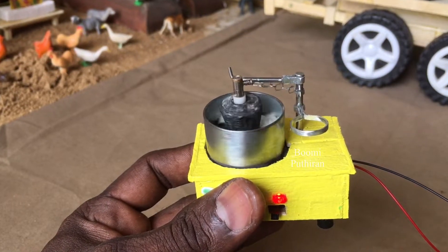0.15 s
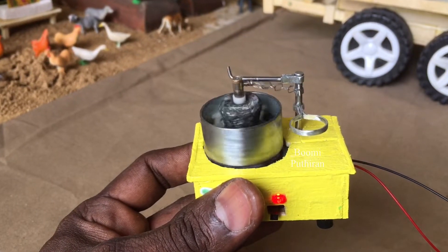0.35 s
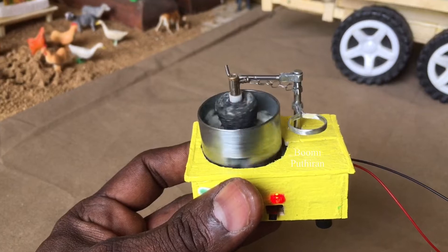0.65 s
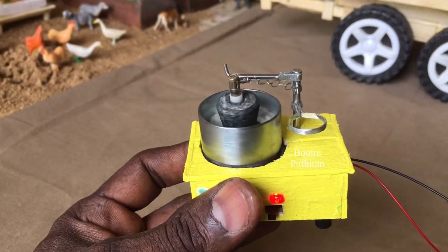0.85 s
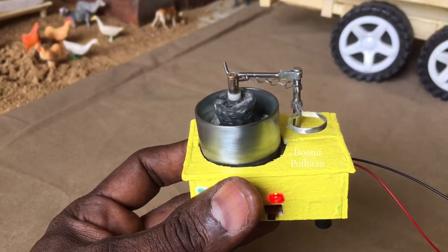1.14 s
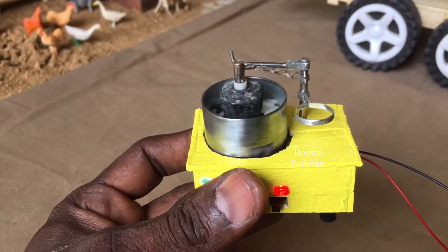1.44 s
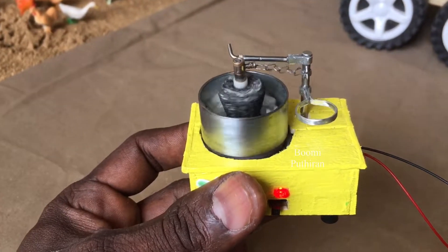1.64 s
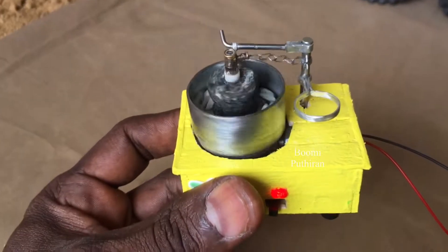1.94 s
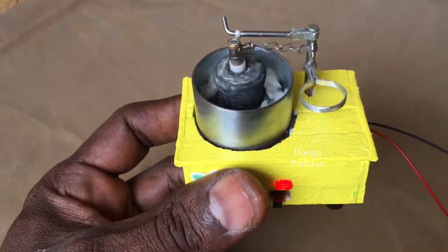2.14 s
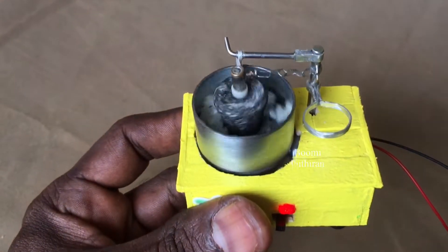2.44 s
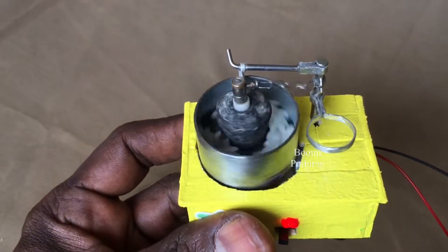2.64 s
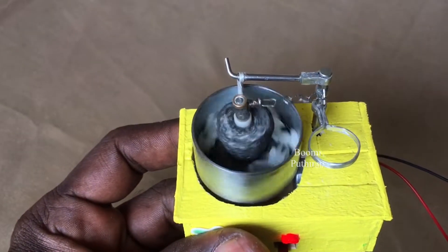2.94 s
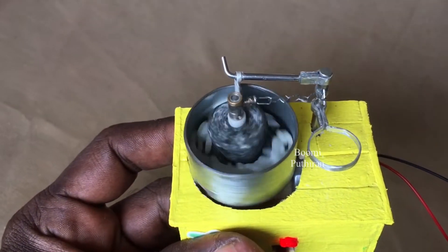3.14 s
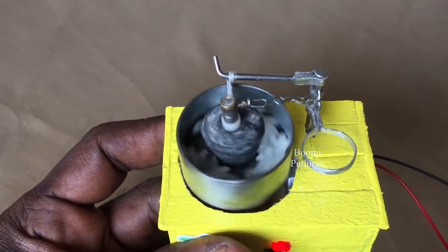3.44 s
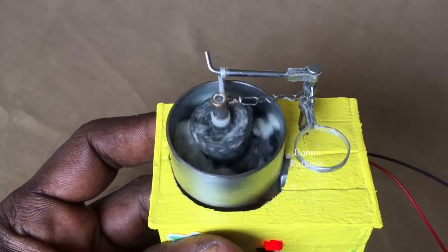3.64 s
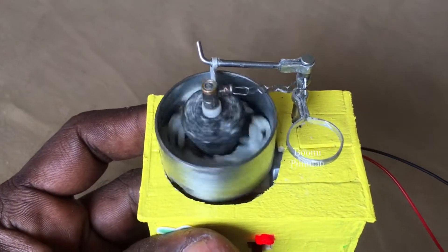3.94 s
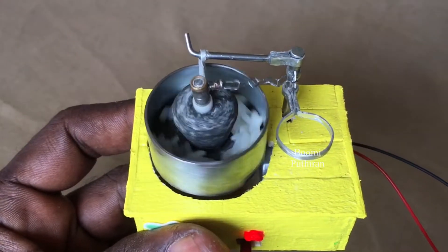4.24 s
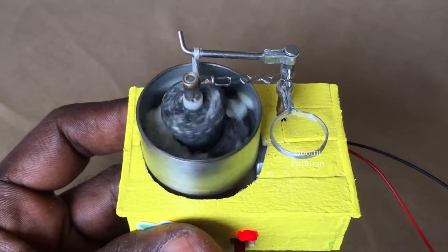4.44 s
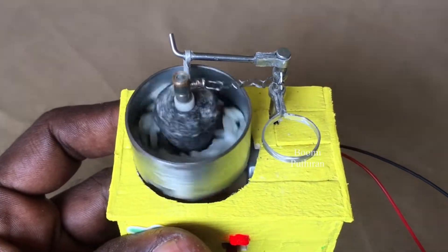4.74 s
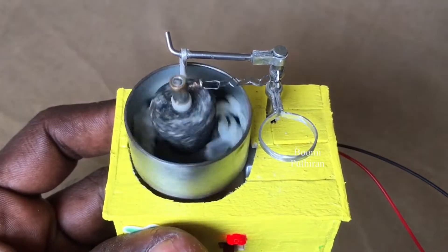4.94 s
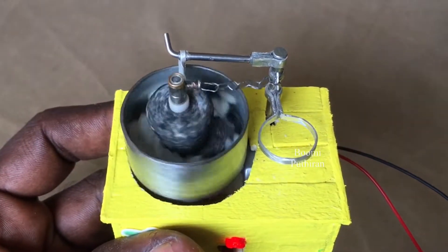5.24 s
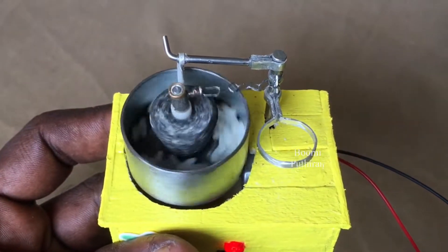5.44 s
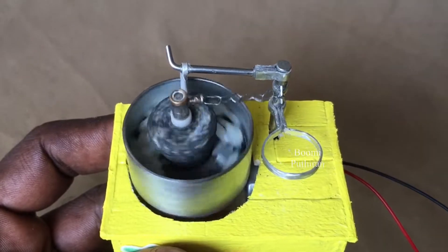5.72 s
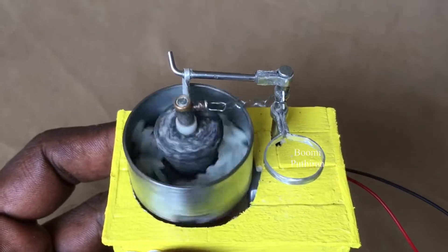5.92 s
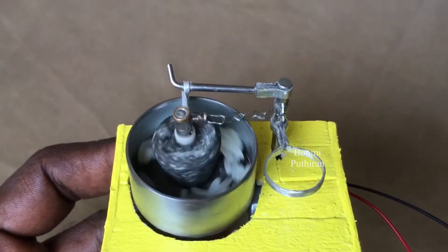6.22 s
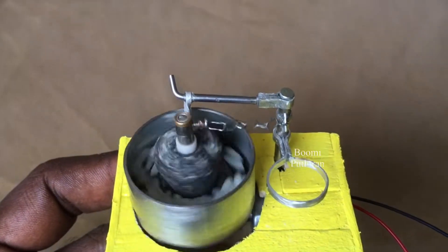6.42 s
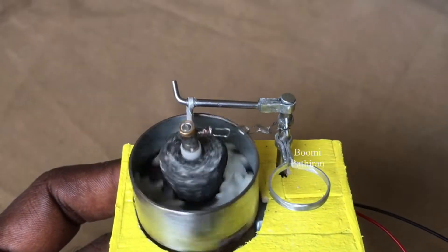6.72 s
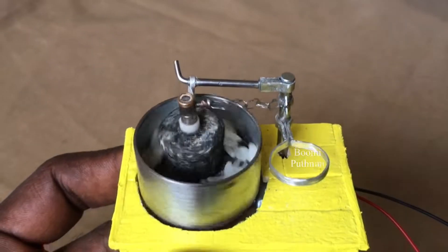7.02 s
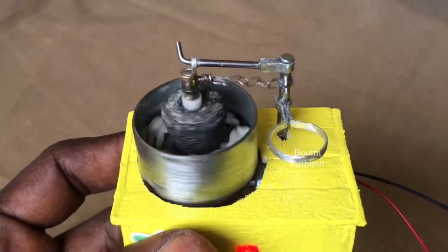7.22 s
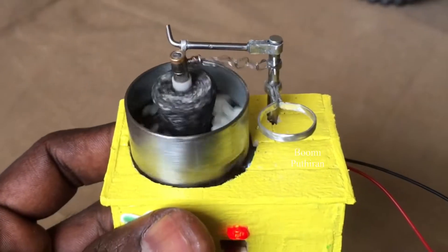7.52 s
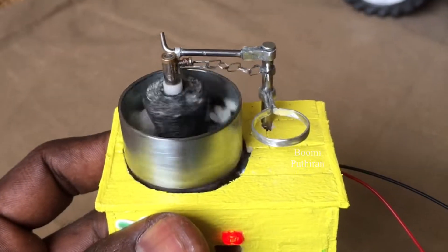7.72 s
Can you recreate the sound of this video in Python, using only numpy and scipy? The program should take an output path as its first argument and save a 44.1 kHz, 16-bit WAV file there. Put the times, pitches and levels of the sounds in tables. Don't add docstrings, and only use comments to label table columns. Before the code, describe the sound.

A tiny geared motor chatters with a steady, hissy metallic rattle close up, broken by a few hard knocks and handling rubs over faint traffic rumble.

```python
import sys
import numpy as np
from scipy import signal
from scipy.io import wavfile
from scipy.ndimage import uniform_filter1d

SR = 44100
rng = np.random.default_rng(int(sys.argv[2]) if len(sys.argv) > 2 else 0)


def volts_from_decibels(level):
    exponent = np.asarray(level, float) / 20
    return 10 ** exponent


def transcribe(u):
    v = np.clip(np.atleast_2d(u).T, -1, 1)
    q = np.round(v * 32767).astype(np.int16)
    wavfile.write(sys.argv[1], SR, q)


N = 347067
CIRCLE = abs(np.fft.fftfreq(8192, 1 / SR))

# f/Hz, width/Hz, level/dB
STAND_MODES = [(144, 15, 9), (222, 21, 10), (347, 90, 2), (455, 54, 0), (570, 79, -12), (690, 48, -4),
               (937, 40, -6), (1034, 28, -10), (1110, 37, -6), (1180, 130, -14)]


def evened(x):
    return x / np.sqrt(np.mean(x ** 2) + 1e-20)


def curves(rows):
    s, *columns = np.transpose(rows)
    return [np.interp(np.arange(N) / SR, s, column) for column in columns]


def drift(hz):
    low_pass = signal.butter(2, hz, fs=SR, output="sos")
    return evened(signal.sosfilt(low_pass, rng.standard_normal(N)))


def hump(start, length, peak):
    out, peak = np.zeros(N), np.clip(peak, .05, .95)
    part = out[round(start * SR):][:round(length * SR)]
    u = np.arange(len(part)) / (length * SR)
    part[:] = np.sin(np.pi / 2 * np.minimum(u / peak, (1 - u) / (1 - peak)))
    return out


def causal(x, log_gain):
    taps = np.fft.ifft(np.exp(np.conj(signal.hilbert(log_gain)))).real[:4096]
    return signal.oaconvolve(x, taps)[:N]


def coloured(x, points):
    f, db = np.transpose(points)
    gain_db = np.interp(np.log(CIRCLE + 1), np.log(f + 1), db)
    return evened(causal(x, np.log(volts_from_decibels(np.maximum(gain_db, -90)))))


def through(x, peaks, steep=1.3, floor_db=-40):
    power = sum(volts_from_decibels(2 * db) / (1 + (2 * (CIRCLE - f) / w) ** 2) ** steep for f, w, db in peaks)
    return evened(causal(x, np.log(power + volts_from_decibels(2 * floor_db)) / 2))


def resonate(x, hz, width):
    turn = np.exp(2j * np.pi * np.cumsum(hz) / SR)
    r = np.exp(-np.pi * width / SR)
    return 2 * (turn * signal.lfilter([1 - r], [1, -r], x / turn)).real


def decaying(modes, t):
    return sum(volts_from_decibels(db - 60 * t / t60) * np.sin(2 * np.pi * hz * t) for hz, db, t60 in modes) * (t > 0)


def street():
    # t/s, level/dB, drone f/Hz (unused)
    traffic = [(0.0, -38.5, 68.55), (0.9, -42, 65.1), (1.4, -42, 73.1), (2.39, -39, 65.5), (2.96, -38, 69),
               (3.24, -37.5, 62.45), (3.35, -35.5, 68.3), (3.62, -38.5, 63), (5.72, -35.5, 69.3),
               (6.11, -33.5, 74.56), (6.68, -33, 69.03), (6.79, -32, 61.5), (7.52, -33, 73.4),
               (7.87, -27.5, 75.6)]
    # t/s, f/Hz, level/dB
    engine_note = [(0.0, 68.3, -47), (0.08, 67.5, -42), (1.18, 65.1, -44), (1.42, 71.6, -45),
                   (3.2, 61, -42.5), (3.37, 65.4, -42.5), (3.64, 61.3, -50), (4.05, 62.4, -35),
                   (4.08, 62.4, -50), (4.6, 65.5, -42), (5.72, 68.5, -36.5), (6.03, 71.74, -36),
                   (6.31, 68.7, -38), (6.64, 69, -34), (6.79, 62.7, -39), (6.97, 62.4, -36),
                   (7.21, 67.6, -35.5), (7.87, 74.9, -38)]
    # multiple of its note, level/dB
    orders = [(1, -13), (1.5, -1), (2, -8.5), (3, -16.5)]
    # f/Hz, wander/Hz, level against traffic/dB
    strands = [(117.2, 6.3, -10.5), (151, 2.95, -11), (179, 3.6, -21.5), (210.6, 1.6, -22),
               (252.6, 7.4, -29)]
    # f/Hz, density/dB per Hz
    rumble_colour = [(15, -60), (25, -29), (41, -15.5), (64, 3), (140, -0.5), (214, -16), (237, -26),
                     (270, -25.5), (409, -82), (588, -34), (919, -37), (1070, -45), (1300, -35),
                     (1690, -82), (2860, -120)]
    # f/Hz, density/dB per Hz
    air_colour = [(130, -33.5), (220, 1.5), (292, -4), (344, -4), (384, -8.5), (513, -12.5), (964, -1.5),
                  (1600, -13.5), (2080, -57), (3520, -120)]
    # t/s, level/dB
    air_level = [(0, -49), (.7, -49.5), (1.1, -50), (1.6, -46), (2.08, -57), (2.18, -58.5), (7.2, -62),
                 (7.4, -78), (7.87, -63)]
    level_db = curves(traffic)[0]
    hz, note_db = curves(engine_note)
    drone_db = note_db + 1 + 1.5 * drift(11.0)
    rough = rng.standard_normal(N)
    drone = np.sin(2 * np.pi * np.cumsum(hz) / SR)
    for k, db in orders:
        drone = drone + 0.34 * volts_from_decibels(db) * evened(resonate(rough, k * hz, 1.1))
    wash = coloured(rng.standard_normal(N), rumble_colour)
    rumble = volts_from_decibels(level_db - 0.55 - 0.26 * drift(8.0)) * wash
    air = volts_from_decibels(curves(air_level)[0] + 1.3 * drift(30)) * coloured(rng.standard_normal(N), air_colour)
    notes = 0
    for note_hz, wander, db in strands:
        wavering_db = level_db + db + 3.5 * drift(2.35)
        note = resonate(wash[::-1], note_hz + wander * drift(1.64), 5.6)
        notes = notes + volts_from_decibels(wavering_db) * evened(note)
    return rumble + notes + volts_from_decibels(drone_db) * drone + air


def rub():
    # start/s, length/s, low rub/dB, high rub/dB
    finger_strokes = [(0.8, 0.16, -43.5, -47), (0.922, 0.072, -46.5, -50), (0.985, 0.25, -45.5, -47),
                      (1.413, 0.091, -36, -49), (1.74, .17, -38.5, -47), (1.86, 0.19, -40.5, -43),
                      (1.973, .07, -54, -57), (2.04, 0.12, -46, -47), (7.473, 0.074, -40, -54),
                      (7.781, 0.029, -46, -51), (7.833, 0.061, -46, -57)]
    # middle t/s, length/s, level/dB
    lurches = [
        (1.83, .13, -36),
        (7.481, .025, -29),
        (7.511, .025, -32),
        (.88, .085, -33.5),
    ]
    friction = rng.standard_normal(N) * volts_from_decibels(2.9 * drift(38))
    low = through(friction, STAND_MODES[:5], steep=1.4)
    high = through(friction, STAND_MODES[5:], steep=1.4)
    strokes = sum(hump(s, length, 0.29) ** 0.97 * (volts_from_decibels(low_db + 0.5) * low + volts_from_decibels(high_db - 3.0) * high)
                  for s, length, low_db, high_db in finger_strokes)
    thump = through(friction, [(32, 20, -0.097), (151, 60, -1.3)], steep=1.8)
    return strokes + sum(volts_from_decibels(db) * hump(s - length / 2, length, 0.55) for s, length, db in lurches) * thump


def slips():
    # t/s, low modes/dB, middle mode/dB, high modes/dB
    plucks = [(1.753, -41, -48, -52), (1.777, -38, -42, -30), (1.793, -34, -40, -52),
              (1.799, -44, -36, -33), (1.812, -28.5, -50, -48), (1.825, -36, -46, -36),
              (1.841, -34, -50, -44), (1.852, -33, -35, -36), (1.875, -46, -40, -34),
              (1.899, -51, -46, -34), (1.918, -49, -44, -31), (1.933, -46, -33, -29),
              (1.945, -54, -36, -34), (1.998, -55, -48, -40), (2.012, -51, -43, -42),
              (2.027, -53, -44, -34), (2.06, -69, -52, -28), (2.074, -51, -36, -43), (2.091, -50, -50, -49),
              (2.112, -50, -48, -42)]
    # start/s, length/s, level/dB
    scuffs = [
        (7.487, 0.035, -43),
        (1.908, .012, -43),
        (1.75, 0.018, -49),
        (1.88, .08, -48),
    ]
    rise_s, damping = .002, 1.4
    out, t = np.zeros(N + SR), np.arange(SR // 6) / SR
    luck = rng.standard_normal((len(plucks), len(STAND_MODES)))
    for (s, low_db, mid_db, high_db), chances in zip(plucks, luck):
        modes = []
        for (hz, width, db), chance in zip(STAND_MODES, chances):
            pluck_db = low_db - 4.5 if hz < 640 else mid_db + 3.0 if hz < 800 else high_db + 2.0
            modes.append((hz, db + pluck_db + 2.5 * chance, 2.5 / (damping * width)))
        out[round(s * SR):][:len(t)] += decaying(modes, t) * (1 - np.exp(-t / rise_s))
    grain = rng.standard_normal(N) * volts_from_decibels(2.7 * drift(150))
    skin = through(grain, [(600, 500, 1.0), (1100, 500, -6.0)], steep=1.8)
    return out[:N] + skin * sum(volts_from_decibels(db) * hump(s, length, 0.33) for s, length, db in scuffs)


def creak(start, length, first_hz, last_hz, db, overtone_db):
    t = np.arange(N) / SR - start
    hz = first_hz + (last_hz - first_hz) * np.clip(t / length, 0, 1)
    turns = np.cumsum(hz * (1 + 0.0049 * drift(29.5))) / SR
    tone = np.sin(2 * np.pi * turns) + volts_from_decibels(overtone_db) * np.sin(3 * np.pi * turns)
    fade_s = 0.018
    held = np.clip(np.minimum(t, length - t) / fade_s + .5, 0, 1)
    return np.sqrt(2) * volts_from_decibels(db + 3.4 * drift(16)) * held * tone


def creaks():
    # start/s, length/s, first f/Hz, last f/Hz, level/dB
    joint = [
        (0, 0.15, 422, 387, -49.5),
        (.15, .19, 389, 380, -50),
        (0.355, .1, 385, 378, -51.5),
        (.48, .045, 408, 400, -56),
        (.759, 0.11, 400, 385, -54),
    ]
    # start/s, length/s, first f/Hz, last f/Hz, level/dB
    low_joint = [
        (0.337, 0.383, 296.4, 291, -56),
    ]
    return sum(creak(*row, -13.5) for row in joint) + sum(creak(*row, -30.0) for row in low_joint)


def knocks():
    hard_s = [1.394, 1.5877, 7.2946, 7.6306]
    hard_side = (1, -1, -1, -1)
    hard_damping = [1.45, 1.2, 1.1, 1.4]
    hard_levels = [
        (-8.2, -17.5, -18, -5),
        (-18, -61, -28, -3),
        (-19.5, -19, -24, -14.5),
        (-15, -18.5, -18, -12),
    ]
    # tick/dB, tick fall per octave/dB, ring/dB, high ring/dB
    hard_extras = [
        (-27, 1, -26.5, -48),
        (-27, -24, -37, -25),
        (-15.5, -14, -30.5, -41),
        (-11.5, -3.5, -27, -36),
    ]
    # t/s, level/dB, place from foot 0 over post 1 and clamp 2 to arm 3
    taps = [(0.731, -39.5, 2), (.836, -30, .1), (1.367, -33, 0.1), (1.488, -26, 0), (1.709, -38, 2),
            (1.914, -37, 2), (1.969, -18, 0.51), (2.529, -31.5, 0.34), (2.885, -27, 0.72),
            (3.593, -29, 0.41), (4.456, -56, 0.5), (5.284, -53, 2.1), (5.567, -35.5, 0.6),
            (5.804, -29.5, 0.55), (6.076, -31.5, 0.16), (6.29, -47, 1.7), (7.476, -17.5, 0.12),
            (7.508, -22.5, 0), (1.581, -22, 0.1), (1.5975, -27, 2), (1.605, -21, 0.28), (1.414, -32, .7),
            (7.301, -15, 0.33), (7.637, -18.5, 0.7)]
    # t/s, level/dB
    rebounds = [
        (7.309, -16.5),
        (8, -30),
        (7.647, -21),
        (1.411, -26),
    ]
    places = [
        (-9.5, -46, -42, -32),
        (-11.5, -12, -4, -4),
        (-14, -26, -4, 6.5),
        (-30, -4, -26, -26),
    ]
    # f/Hz, t60/s
    knock_modes = [(342, 0.051), (500, 0.027), (730, 0.028), (1025, 0.016)]
    # sign, delay/s, rise/s
    arrival = [(-1, .001, .0008), (1, .0007, .0005), (-1, .0003, .0006), (1, 0, .0007)]
    # t/s, factor
    grip = [(1.4, 1.02), (1.59, 0.85), (1.97, 1.08), (2.5, 1.03), (7.3, 1), (7.476, 0.656), (7.507, 0.84),
            (7.6, 1)]
    # f/Hz, t60/s
    contact = [(1400, .011), (2300, .0055), (4200, .004)]
    # f/Hz, level/dB, t60/s
    after_ring = [(225, 1, .1), (468, 0, .16), (514, 0, .15), (735, -9, .2), (900, -14, .12)]
    late_s = .00155
    out, t = np.zeros(N + SR), np.arange(SR // 3) / SR
    blows = [(s, side, 1, damp, levels)
             for s, side, damp, levels in zip(hard_s, hard_side, hard_damping, hard_levels)]
    for s, db, place in taps + [(*row, len(places) - 1) for row in rebounds]:
        soft = 1.5 + max(-29 - db, 0) / 24
        levels = [db + np.interp(place, range(len(places)), mode) for mode in np.transpose(places)]
        blows.append((s, 1, soft, 1, levels))
    for s, side, soft, damp, levels in blows:
        shifts = (np.interp(s, *np.transpose(grip)), 1, 1, 1)
        blow = 0
        for db, shift, slow, (hz, t60), (sign, delay, rise) in zip(
                levels, shifts, (damp, 1, 1, 1), knock_modes, arrival):
            swell = 1 - np.exp(-((t - delay) / (soft * rise)) ** 2)
            blow = blow + sign * swell * decaying([(hz * shift, db, t60 / slow)], t - delay)
        out[round((s + late_s) * SR):][:len(t)] += side * volts_from_decibels(7.5) * blow
    for s, side, (tick_db, fall_db, ring_db, high_db) in zip(hard_s, hard_side, hard_extras):
        ticks = [(hz, tick_db + fall_db * np.log2(hz / contact[0][0]), t60) for hz, t60 in contact]
        tick = decaying(ticks, t) * (1 - np.exp(-(t / .0007) ** 2))
        high_ring = decaying([(1275, high_db, 0.12), (1310, high_db - 4.0, 0.12)], t)
        ring = (volts_from_decibels(ring_db) * decaying(after_ring, t) + high_ring) * (1 - np.exp(-t / .008))
        out[round((s + late_s) * SR):][:len(t)] += side * volts_from_decibels(5.0) * tick + ring
    return out[:N]


def scattered(x):
    t = np.arange(6000) / SR
    tail = rng.standard_normal(len(t)) * volts_from_decibels(-60 * t / 0.031) * (t > .007)
    return x + volts_from_decibels(-19) * signal.oaconvolve(x, tail / np.linalg.norm(tail))[:N]


def teeth():
    shaft_hz = (34.0, 76.5, 5.8)
    # t/s, pinion/turns, idler/turns, drum/turns
    shaft_lead = [(0.0, -0.25, -0.17, 0.02), (0.6, -0.17, -0.06, 0.02), (1.2, -0.09, 0.12, 0.06),
                  (1.8, -0.05, 0.23, 0.12), (2.4, 0.03, 0.31, 0.19), (3.0, 0.03, 0.36, 0.44),
                  (3.6, 0.01, 0.39, 0.45), (4.2, 0.05, 0.48, 0.47), (4.8, 0.06, 0.48, 0.48),
                  (5.4, 0.01, 0.39, 0.49), (6.0, -0.02, 0.29, 0.51), (6.6, -0.1, 0.01, 0.54),
                  (7.2, -0.23, -0.16, 0.79), (7.87, -0.27, -0.27, 0.94)]
    # times per turn, depth/dB, lag/radians
    pinion_spots = [(1, 2.5, 0), (2, 2.5, -2.5), (3, 0.5, -1.8), (4, -0.5, -5.5)]
    # times per turn, depth/dB, lag/radians
    idler_spots = [(1, 0.69, 0.0048)]
    # times per turn, depth/dB, lag/radians
    drum_spots = [(1, 0.99, 0.0055)]
    # t/s, peak/dB
    clacks = [(0.7028, -21), (1.0522, -13), (1.1826, -12), (1.246, -14), (1.4033, -15), (1.8248, -31),
              (2.149, -12), (2.3253, -17), (2.3774, -18), (2.5287, -20), (3.467, -17), (3.588, -19),
              (3.827, -18), (4.0342, -16), (4.371, -16), (4.437, -18), (4.959, -16), (5.443, -15),
              (5.56, -16), (5.6173, -17), (5.6387, -15), (5.7992, -12.5), (6.321, -18), (6.3427, -20),
              (6.652, -15), (6.8522, -15.5), (6.8887, -16), (7.094, -23), (7.2649, -16), (7.3297, -16),
              (0.0413, -28), (0.309, -18), (0.6225, -35), (1.6214, -16), (1.8824, -22), (1.9675, -20),
            (2.6735, -31), (3.1401, -24), (3.1733, -16), (3.2076, -16), (3.49, -29), (3.852, -18),
            (3.8756, -22), (3.94, -19), (3.9933, -28), (4.1048, -56), (4.2017, -18), (4.292, -35),
            (4.4166, -15), (4.9318, -16), (5.092, -15), (5.209, -22), (5.312, -31), (5.666, -23),
            (5.855, -26), (5.971, -24), (6.0222, -39), (6.2059, -16), (6.4158, -31), (6.7725, -27),
            (6.794, -28), (7.205, -24), (7.3786, -26), (7.45, -20)]
    # start/s, length/s, share lost
    slack = [
        (0.692, 0.0077, 0.36),
        (2.371, 0.0066, 0.59),
        (4.366, 0.0089, 0.53),
        (5.791, 0.01, 0.47),
        (6.333, 0.01, 0.47),
        (6.639, 0.0094, .6),
        (4.107, 0.0067, 0.37),
    ]
    # band/Hz (two), feel of load, own flicker/dB, hiss, blow share
    parts = ((318.6, 7300, 0.54, 0.7, 1.21, 0.25),
             (5820, 9850, 0.98, 1.3, 0.51, 0.56),
             (10300, 20000, 0.72, 2.3, 0.46, 0.59))
    t = np.arange(N) / SR
    turns = [hz * t + lead for hz, lead in zip(shaft_hz, curves(shaft_lead))]
    tight_db = sum(db * np.cos(2 * np.pi * k * turn + lag)
                   for turn, spots in zip(turns, (pinion_spots, idler_spots, drum_spots))
                   for k, db, lag in spots)
    load_db = tight_db + 0.88 * drift(26) + 1.17 * drift(200)

    chance, size, sign = rng.random(N), rng.exponential(1, N), rng.standard_normal(N)
    impacts = evened((chance < 3000 / SR) * volts_from_decibels(2.76 * np.minimum(size, 3.2)) * np.sign(sign))
    grit_window = np.hanning(round(.0014 * SR))
    grit = evened(np.convolve(abs(impacts), grit_window, "same") ** 1.26)
    impacts = evened(impacts + 2.0 * grit * sign)

    s, db = np.transpose(clacks)
    blows = np.zeros(N)
    blows[np.round(s * SR).astype(int)] = volts_from_decibels(db + 36.0)
    burst = np.arange(300) / SR
    blows = np.convolve(blows, 1.25 * (burst / 0.00083) ** 2 * np.exp(-burst / 0.00077))[:N]

    drive = 0
    for lo_hz, hi_hz, feel, own_db, hiss, share in parts:
        pressed = volts_from_decibels(feel * load_db + own_db * drift(93))
        other = np.roll(impacts, SR // 50 * int(np.log2(lo_hz)))
        part = evened(pressed * (impacts + 0.53 * other + hiss * rng.standard_normal(N)))
        part = part + share * blows * rng.standard_normal(N)
        band = signal.butter(2, (lo_hz, hi_hz), "band", fs=SR, output="sos")
        drive = drive + signal.sosfiltfilt(band, part)
    return drive * (1 - sum(np.clip(lost, 0, 1) * hump(s, length, 0.51) for s, length, lost in slack))


def cavity(x, wet_db=-14.0, t60=.05):
    t = np.arange(3000) / SR
    tail = rng.standard_normal(len(t)) * volts_from_decibels(-60 * t / t60) * (t > .002)
    return evened(x + volts_from_decibels(wet_db) * signal.oaconvolve(x, tail / np.linalg.norm(tail))[:N])


def rim(x, pose):
    # f/Hz, sharpness
    dips = [(6700, 15), (8200, 32), (10450, 26), (11550, 24.0), (12950, 28)]
    dipped = x
    for hz, sharp in dips:
        dipped = signal.lfilter(*signal.iirnotch(hz, sharp, SR), dipped)
    shine = signal.sosfiltfilt(signal.butter(2, 13300, "high", fs=SR, output="sos"), x)
    tipped_share = np.clip(pose - 2.17, 0, 1)
    return x + tipped_share * (0.26 * (dipped - x) + 0.34 * shine)


def motor():
    # t/s, level/dB
    chatter_level = [(0, -38), (.26, -39.5), (.6, -38.5), (1.2, -40), (1.5, -39.5), (2.2, -39), (3, -39.5),
                     (4, -38.5), (5.1, -39), (6.8, -38.5), (7.3, -40), (7.87, -40)]
    # t/s, pose from upright 0 to back 4
    tilt = [(0, 0.01), (1.5, 0.075), (1.8, 1.1), (2.2, 2.4), (2.5, 2.26), (3.2, 2.6), (6.6, 3.28),
            (7.2, 3.36), (7.5, 3.5), (7.87, 3.63)]
    # t/s, boom against chatter/dB
    facing = [(0, -4.5), (.5, -2.5), (1, 0.5), (2.2, 1), (4.4, 1), (7.87, 1)]
    # f/Hz, width/Hz, level/dB
    tin_modes = [(2834, 47, 2), (3416, 104, 0), (3785, 44, 5), (6130, 790, -1.5), (8100, 72, -32),
                 (9840, 280, 2), (11300, 580, 0), (12070, 980, 7.5), (13900, 590, -1.5)]
    # f/Hz, width/Hz, level/dB
    box_modes = [(1300, 530, -10.5), (1761, 170, -0.5), (1900, 237, 4), (2105, 185, -4)]
    # f/Hz, density/dB per Hz
    upright = [(1350, -44), (2300, -7.5), (2490, -10), (3070, -9), (3580, -3), (4980, -7.5), (5310, -0.5),
               (5660, -7), (6700, -6), (8200, -11), (9250, 0.5), (12000, -5.5), (13100, -9.5),
               (15100, -3.5), (15700, -6.5)]
    # f/Hz, density/dB per Hz
    turning = [(1350, -34), (2300, -9), (2490, -22), (2700, -3), (3150, -11), (3440, -2.5), (4040, -7),
               (5350, -2), (6240, -8), (6870, -7.5), (10400, -2.5), (11800, -3), (13500, -9), (15200, -6),
               (15700, -3.5)]
    # f/Hz, density/dB per Hz
    leaning = [(1350, -35), (2300, 1), (2450, -15), (2700, -3), (3120, -3.5), (3380, 1), (3760, 1.5),
               (4410, -5.5), (4590, -5.5), (5350, 7), (6190, -4), (8260, 1), (10500, -1), (13100, -1.5),
               (15700, -4.5)]
    # f/Hz, density/dB per Hz
    tipped = [(1350, -22.5), (2300, -22), (2900, -4.5), (3100, -7.5), (3850, -3.5), (4820, -10.5),
              (6040, -2), (6650, -10.5), (7690, -4.5), (9790, -0.5), (10600, -3), (11500, -9.5),
              (12200, -7), (13700, -2.5), (15700, -12)]
    # f/Hz, density/dB per Hz
    back = [(1350, -39), (2300, -4), (2450, -13), (2620, 3), (3170, -6.5), (3790, 1.5), (4310, -7),
            (4480, -8), (5530, 5), (6290, -7), (8200, -3), (9100, -4.5), (10800, 1.5), (13100, -7),
            (15700, -7)]
    drive = teeth()
    chatter_db = curves(chatter_level)[0] + 0.48 * drift(4.4)
    boom_db = chatter_db + curves(facing)[0] + drift(23.0)
    pose, = curves(tilt)
    rung = cavity(drive + 0.57 * through(drive, tin_modes, steep=0.93))
    chatter = sum(np.maximum(1 - abs(pose - k), 0) * coloured(rung, points)
                  for k, points in enumerate((upright, turning, leaning, tipped, back)))
    boom = through(drive + 0.23 * rng.standard_normal(N), box_modes, steep=1.56, floor_db=-51)
    sound = volts_from_decibels(chatter_db + 0.8) * rim(chatter, pose) + volts_from_decibels(boom_db - 1.0) * boom
    return signal.lfilter(*signal.iirnotch(1120, 4.0, SR), sound)


def scene():
    return (street() + rub() + slips() + creaks() + scattered(knocks()) + motor())[None]


def roll_off(x):
    return signal.sosfilt(signal.butter(12, 15880, fs=SR, output="sos"), x)


def record(dry):
    heard = signal.sosfilt(signal.butter(2, 42, "high", fs=SR, output="sos"), dry)
    power_db = 10 * np.log10(abs(uniform_filter1d(heard[0] ** 2, 600, origin=299)) + 1e-12)
    fall = np.arange(N) * 20 / SR
    over_db = np.maximum(np.maximum.accumulate(power_db + fall) - fall + 15.5, 0)
    heard = heard / volts_from_decibels(0.37 * uniform_filter1d(over_db, 500, origin=249))
    squeezed = heard / (1 + abs(heard) ** 12) ** (1 / 12)
    edge = signal.firwin(511, 15700, window=("kaiser", 9), fs=SR)
    mix = signal.oaconvolve(squeezed, edge[None], "same")
    return roll_off(mix)


dry = scene()
out = record(dry)
transcribe(out)
```